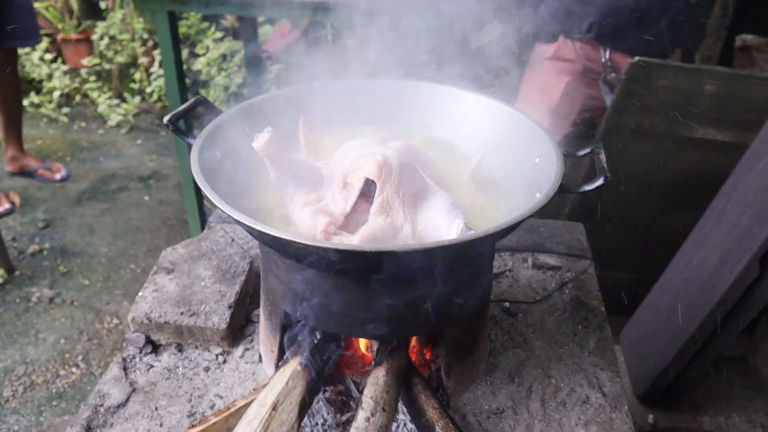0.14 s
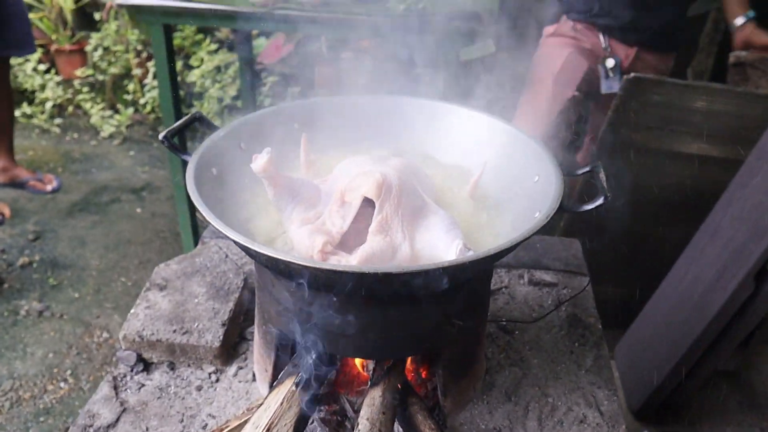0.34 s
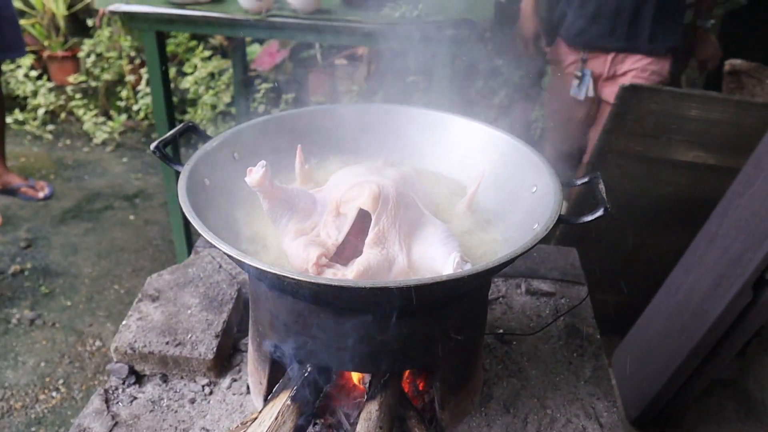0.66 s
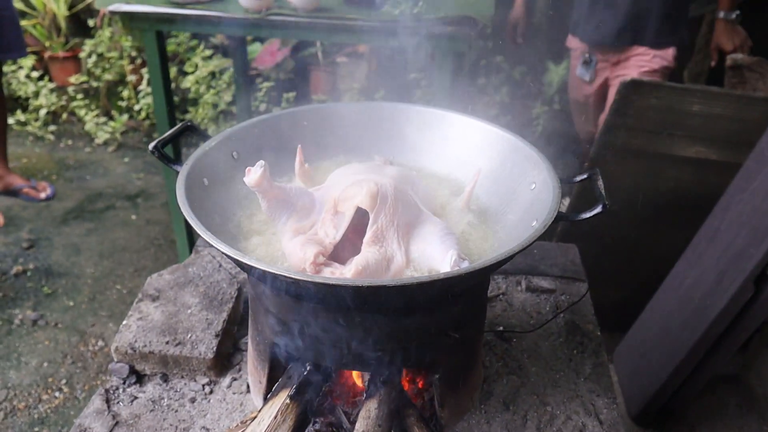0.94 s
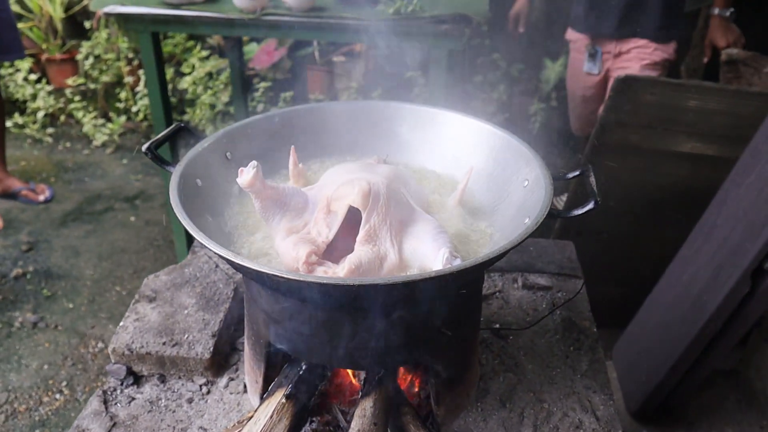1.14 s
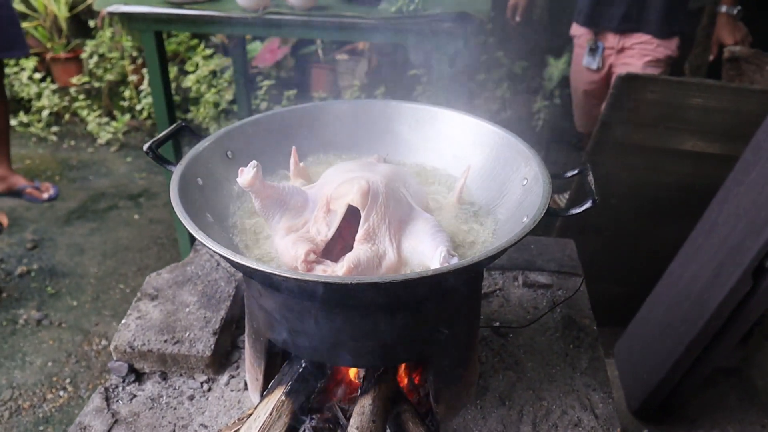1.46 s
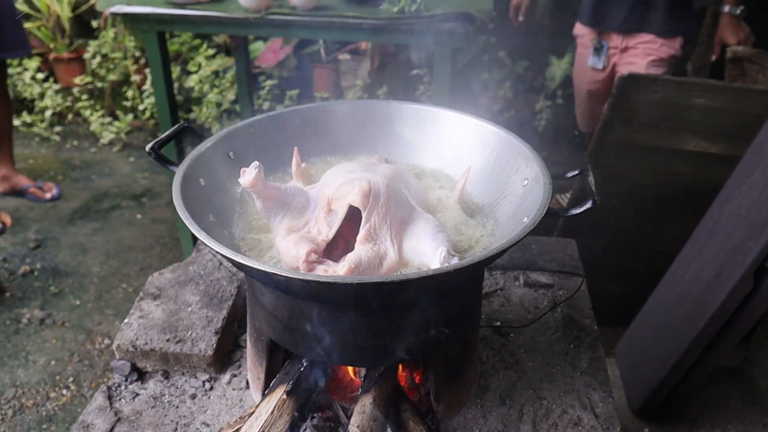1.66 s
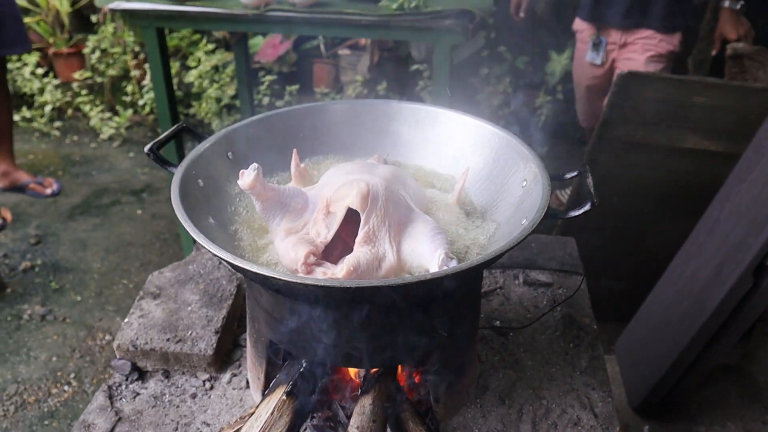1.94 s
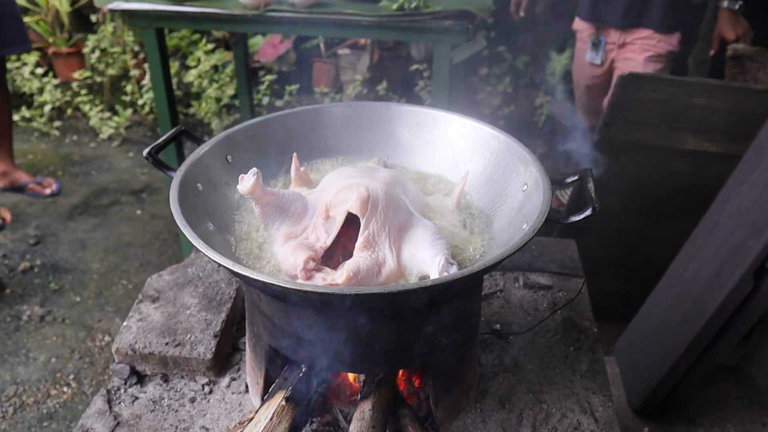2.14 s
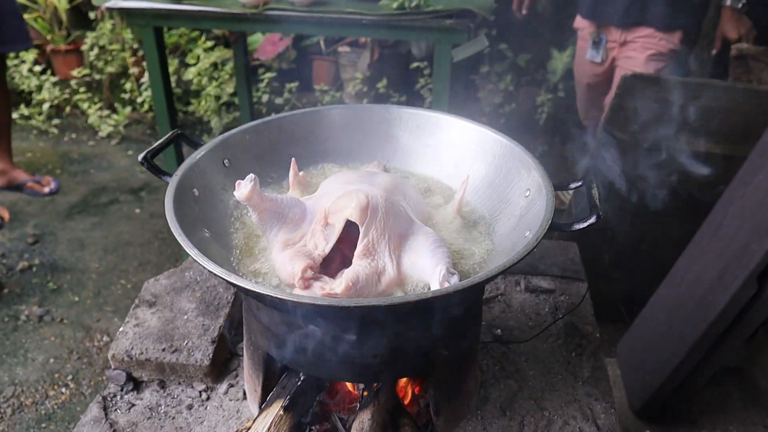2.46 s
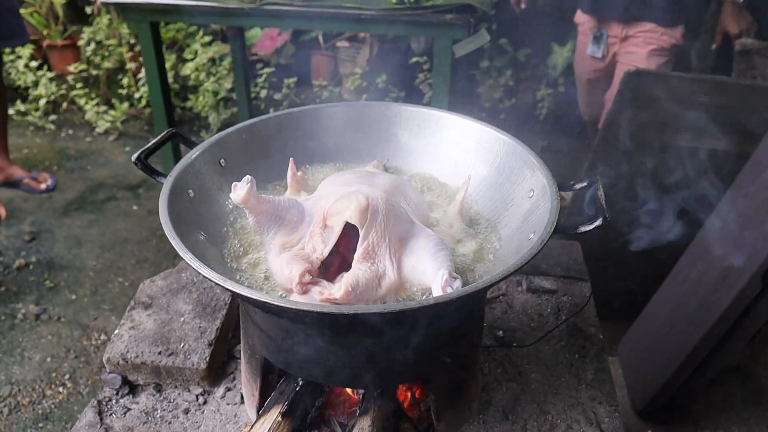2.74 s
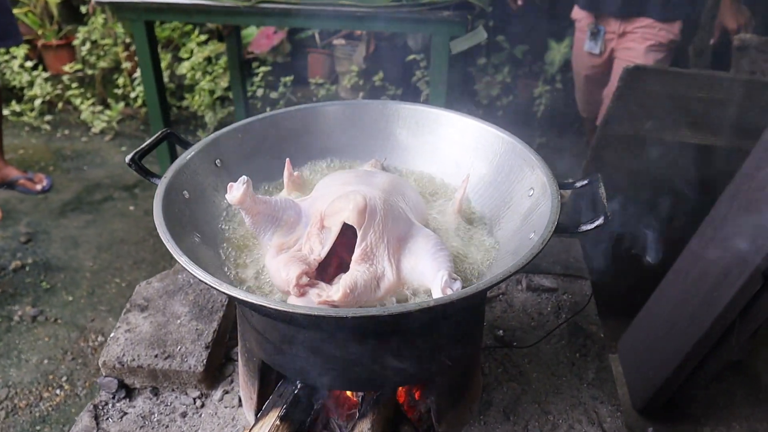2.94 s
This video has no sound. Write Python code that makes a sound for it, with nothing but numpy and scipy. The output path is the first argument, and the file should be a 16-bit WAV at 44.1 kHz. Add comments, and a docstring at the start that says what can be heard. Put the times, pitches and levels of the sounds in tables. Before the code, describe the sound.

A whole chicken frying in hot oil, fierce sizzle easing into crackling, popping bubbles and spits

```python
"""Chicken frying in a wok

A whole chicken fries in a wok of hot oil over a wood fire, outdoors.
The fierce sizzle, a mass of filtered random clicks, settles under a fine crackle of spray and short fizzes.
Steam bubbles stand out as round pops and drops of water as sharp spits, each a ringing, quickly damped sine.
Soft gliding gurgles, the fire's filtered-noise rumble and a wavering hum lie faintly below.
"""
import sys
import numpy as np
from scipy import signal
from scipy.fft import rfft, irfft, next_fast_len
from scipy.io import wavfile

SR = 44100
rng = np.random.default_rng(int(sys.argv[2]) if len(sys.argv) > 2 else 0)


def bounce(signal):
    """Save signal as a 16-bit WAV file at the path given by the first command-line argument."""
    frames = np.transpose(np.atleast_2d(signal))
    limited = np.clip(frames, -1, 1)
    pcm = np.round(limited * 32767).astype(np.int16)
    wavfile.write(sys.argv[1], SR, pcm)


N = 136710  # length in samples

# Vigour of the frying, joined by straight lines: start_s [s], vigour_db [dB]
VIGOUR = [(0, -16.5), (.2, -16.5), (.43, -18), (.55, -19.5), (.9, -21.5), (1.25, -22), (1.5, -24.5),
          (1.7, -22.5), (2.0, -25.5), (2.45, -25), (2.8, -25.5), (3.1, -27)]
# Spectrum of the fire's rumble, shape only: frequency_hz [Hz], level_db [dB per Hz]
FIRE_SPECTRUM = [(20, -11), (60, -10), (120, 1), (200, 4), (330, 10), (700, -42.5), (2000, -50)]
# Low gurgles: start_s [s], length_s [s], start_pitch_hz [Hz], end_pitch_hz [Hz], peak_db [dB]
GURGLES = [(.655, 0.057, 242, 174, -44), (0.684, 0.024, 370, 352, -39.5), (0.867, 0.057, 293, 386, -43),
           (1.618, 0.017, 249, 240, -45), (3.077, 0.025, 520, 543, -30.5)]
# Spectrum of the sizzling foam, shape only: frequency_hz [Hz], level_db [dB per Hz]
SIZZLE_SPECTRUM = [(100, -54), (250, -27.5), (400, -23), (510, -14.5), (700, -10.5), (850, -16.5),
                   (1150, -6), (2000, -3.5), (3200, -0.5), (4500, -2.5), (6000, -5), (7200, -16),
                   (8500, -22.5), (11000, -27.5), (14000, -28), (16000, -51)]
# Spectrum of the crackling spray, shape only: frequency_hz [Hz], level_db [dB per Hz]
CRACKLE_SPECTRUM = [(300, -24.5), (1500, -18), (5500, -6.5), (7200, -2.5), (8500, -7.5), (10500, -4),
                    (12700, -4.5), (14500, -13), (16000, -22)]
# Edges between the bands of the foam's tiny bubbles: edge_hz [Hz]
FOAM_EDGES_HZ = [90, 1000, 2200, 4200, 7800, 18000]
# Edges between the bands of the spray: edge_hz [Hz]
SPRAY_EDGES_HZ = [3000, 8500, 12000, 17000]
# Steam fizzing out from under the skin: start_s [s], length_s [s], level_db [dB]
PUFFS = [(1.363, .02, -31), (1.619, 0.014, -20), (1.649, 0.017, -25), (2.166, 0.019, -25),
         (2.323, .014, -15.5), (2.356, 0.015, -16), (2.599, 0.011, -13), (2.647, 0.015, -17),
         (2.719, 0.0084, -15.5), (2.876, 0.016, -22), (3.055, 0.022, -20)]
# Small bubbles by size, at calm vigour and before trim: pitch_hz [Hz], level_db [dB]
BUBBLE_SIZES = [(520, -22), (700, -17.5), (850, -10.5), (1150, -7.5), (1800, 3.5), (3000, 2), (4500, -2),
                (6200, -6)]
# Large steam bubbles bursting, before trim and wok colour: start_s [s], level_db [dB], pitch_hz [Hz]
POPS = [(0.5562, -11.5, 1060), (.679, -9.5, 1210), (0.6952, -9.5, 1580), (0.801, -6.5, 1490),
        (0.9212, -3.5, 1340), (1.0257, -10.5, 1190), (1.114, -22, 600), (1.316, -15, 1335),
        (1.3336, -9.5, 1740), (1.37, -6, 1390), (1.4121, -12, 2250), (1.4628, -11.5, 2080),
        (1.491, -12.5, 2220), (1.5837, -7.5, 1660), (1.6171, -10, 1960), (1.626, -20.5, 560),
        (1.6472, -13, 2000), (1.6505, -9, 1430), (1.7861, -8, 1580), (1.8923, -7, 1780), (1.9319, -9, 2040),
        (1.9457, -7, 1630), (1.98, -7, 1070), (2.082, -7.5, 2060), (2.0879, -9.5, 1740), (2.0985, -9, 1500),
        (2.1267, -14, 2670), (2.2741, -9.5, 1210), (2.2833, -12, 1060), (2.3344, -8, 2260),
        (2.3571, -10.5, 1120), (2.3734, -6, 1830), (2.4, -10.5, 1510), (2.4882, -11.5, 1940),
        (2.5369, -10, 2210), (2.5619, -15, 2200), (2.5777, -14.5, 1360), (2.6023, -17, 1360),
        (2.742, -2.5, 1320), (2.7782, -7.5, 1560), (2.7913, -10.5, 1580), (2.8505, -7, 1550),
        (2.883, -9, 2430), (2.9715, -11, 2290), (3.0067, -4, 2060)]
# Water drops spitting out of the oil, before trim and wok colour: start_s [s], level_db [dB], pitch_hz [Hz]
SPITS = [(.0664, -14, 12000), (0.4013, 0, 11100), (0.4073, -6, 5530), (0.4411, -2, 11000),
         (.6656, -10, 10300), (0.7403, -9, 5450), (0.755, -18, 4090), (.9149, -7.5, 9200),
         (0.9524, -6, 4990), (.9706, -11, 4000), (1.031, -18, 5340), (1.1678, 1.5, 11600),
         (1.1957, -8, 11300), (1.2822, -7, 11100), (1.4395, -15, 4780), (1.626, -11, 7200),
         (1.651, -8, 5000), (1.7311, -14, 12000), (1.9076, -18, 12000), (2.0754, -6.5, 5600),
         (2.1711, -11, 9500), (2.1773, -13, 2770), (2.3336, -15, 11100), (2.5928, -7, 11300),
         (2.627, -11.5, 11500), (2.7215, -18, 7000), (2.829, -8.5, 5150), (2.8516, -8, 4600),
         (2.8924, -2.5, 4630)]
# How the wok passes the bursts on; small cavities radiate little bass: frequency_hz [Hz], gain_db [dB]
WOK_COLOUR = [(150, -19), (400, -9), (520, -3), (700, -1.5), (860, -6), (1050, 1), (1300, 0.5), (1650, 0),
              (2200, 1.5), (16000, 1.5)]

CALM_DB = -24  # rates and levels below hold at this vigour
CROWDING = .8  # dB of burst rate (20 log10) per dB of vigour

# Fire and hum: levels in dB, speeds of the random drifts in Hz
FIRE_DB, FIRE_FLICKER_DB, FIRE_FLICKER_HZ = -58, 1.5, 8
HUM_DB, HUM_HZ, HUM_WAVER_HZ, HUM_WAVER_RATE_HZ = -68, 142, 2, 5

# Foam and spray: bursts per second, spread and level in dB, dB of level per dB of vigour
SIZZLE_PER_S, SIZZLE_SPREAD_DB, SIZZLE_TRIM_DB, SIZZLE_FOLLOWS = 1900, 3.5, -1.5, 0.99
CRACKLE_PER_S, CRACKLE_SPREAD_DB, CRACKLE_DB, CRACKLE_FOLLOWS = 800, 5, -35.5, 1.6
SURGE_DB, SURGE_RATE_HZ = 1.3, 37.7  # how far and how fast the foam surges
PUFF_BAND_HZ, PUFF_SPREAD_DB = (1570, 4300), 6

# Small bubbles: BUBBLE_SWELL is the dB by which pitch falls (20 log10) per dB of vigour
BUBBLES_PER_S, BUBBLE_TRIM_DB, BUBBLE_SPREAD_DB, BUBBLE_LARGEST_DB = 850, -21.5, 5, 12
BUBBLE_CYCLES, BUBBLE_FOLLOWS, BUBBLE_SWELL = 0.83, 0.18, 0.19

# Single bursts: cycles to the peak, share by which pitch has risen at the peak, trims in dB
POP_CYCLES, POP_RISE, POP_TRIM_DB = 0.77, 0.011, .5
SPIT_CYCLES, SPIT_TRIM_DB = 0.39, 4
SKIN_TRIM_DB, SKIN_HZ = -5, 3540  # tick of a large bubble's skin tearing, around this pitch

SCATTER_DB, SCATTER_T60_S = -13, 0.028  # reflections inside the wok
CUTOFF_HZ = 16000


def from_db(db):
    """Turn decibels into gain."""
    return 10 ** (np.asarray(db) / 20)


def rms_one(x):
    """Scale a sound to rms 1."""
    return x / np.sqrt(np.mean(x ** 2) + 1e-20)


def at_hz(points, hz):
    """Read a spectrum in dB along a log-frequency axis."""
    f, db = np.transpose(points)
    return np.interp(np.log(np.maximum(hz, 1)), np.log(f), db)


def drift(rate_hz):
    """Wander at random with rms 1: noise smoothed by two equal poles, after a second to settle."""
    pole = np.exp(-2 * np.pi * rate_hz / SR)
    noise = rng.standard_normal(N + SR)
    return rms_one(signal.lfilter([1], [1, -2 * pole, pole * pole], noise)[SR:])


def colour(x, spectrum):
    """Give a sound a spectrum with a causal, minimum-phase filter built by folding the cepstrum."""
    size = 2 * next_fast_len(N)
    gain = from_db(at_hz(spectrum, np.arange(size // 2 + 1) * SR / size))
    cepstrum = irfft(np.log(gain))
    cepstrum[1:size // 2] *= 2
    cepstrum[size // 2 + 1:] = 0
    response = np.exp(rfft(cepstrum))
    return irfft(rfft(x, size) * response)[:N]


def band_pass(x, band_hz):
    """Keep one band of a sound."""
    return signal.sosfilt(signal.butter(2, band_hz, "band", fs=SR, output="sos"), x)


def add(out, start_s, sound):
    """Mix a sound in at a time."""
    i = int(np.clip(start_s * SR, 0, N))
    out[i:i + len(sound)] += sound[:N - i]


def sizes(chance, spread_db):
    """Turn uniform chance into many small bursts and few large ones, with a ceiling."""
    return from_db(-spread_db * np.log(.012 + .988 * chance))


def clicks(per_s, spread_db):
    """Scatter clicks of either sign; where they crowd they shrink, so mean power stays even."""
    born = rng.random(N) < per_s / SR
    heights = sizes(rng.random(N), spread_db)
    signs = rng.choice([-1, 1], N)
    return rms_one(born * heights * signs / np.sqrt(per_s))


def grains(per_s, spread_db, edges_hz):
    """Let each size of tiny bubble burst in its own band and at its own moments."""
    bands = zip(edges_hz, edges_hz[1:])
    return sum(band_pass(clicks(per_s, spread_db), band) for band in bands)


def burst(pitch_hz, cycles, rise):
    """Burst a bubble: its cavity rings up within a cycle or so and dies at once; rise lifts the pitch."""
    t = np.arange(int(10 * cycles / pitch_hz * SR) + 2) / SR
    age = t * pitch_hz / cycles  # 1 at the peak
    envelope = age * np.exp(1 - age)
    return envelope * np.sin(2 * np.pi * pitch_hz * t * (1 + rise * age / 2))


def fire():
    """The fire's rumble: low coloured noise whose level flickers at random."""
    rumble = rms_one(colour(rng.standard_normal(N), FIRE_SPECTRUM))
    return rumble * from_db(FIRE_DB + FIRE_FLICKER_DB * drift(FIRE_FLICKER_HZ))


def hum():
    """A faint low sine whose pitch wavers at random."""
    pitch_hz = HUM_HZ + HUM_WAVER_HZ * drift(HUM_WAVER_RATE_HZ)
    return from_db(HUM_DB) * np.sin(2 * np.pi * np.cumsum(pitch_hz) / SR)


def gurgles():
    """Soft, low sines glide in pitch under the sizzle, each swelling and fading."""
    out = np.zeros(N)
    for start_s, length_s, start_hz, end_hz, peak_db in GURGLES:
        pitch_hz = np.linspace(start_hz, end_hz, int(length_s * SR))
        tone = np.sin(2 * np.pi * np.cumsum(pitch_hz) / SR)
        add(out, start_s, from_db(peak_db) * np.hanning(len(tone)) * tone)
    return out


def foam(vigour_db):
    """Countless tiny bursts make the surging sizzle, denser and louder with vigour."""
    surge_db = SURGE_DB * drift(SURGE_RATE_HZ)
    per_s = SIZZLE_PER_S * from_db(CROWDING * vigour_db)
    sizzle = rms_one(colour(grains(per_s, SIZZLE_SPREAD_DB, FOAM_EDGES_HZ), SIZZLE_SPECTRUM))
    return sizzle * from_db(CALM_DB + SIZZLE_TRIM_DB + SIZZLE_FOLLOWS * vigour_db + surge_db)


def spray(vigour_db):
    """Sparser bursts crackle on top; their rate and level climb more steeply with vigour."""
    per_s = CRACKLE_PER_S * from_db(CROWDING * vigour_db) ** 2
    crackle = rms_one(colour(grains(per_s, CRACKLE_SPREAD_DB, SPRAY_EDGES_HZ), CRACKLE_SPECTRUM))
    return crackle * from_db(CRACKLE_DB + CRACKLE_FOLLOWS * vigour_db)


def puffs():
    """Steam fizzes out from under the skin: short, dense runs of tiny bursts in one band."""
    swell = np.zeros(N)
    for start_s, length_s, level_db in PUFFS:
        add(swell, start_s, from_db(level_db) * np.hanning(int(length_s * SR)))
    return swell * rms_one(band_pass(clicks(SIZZLE_PER_S, PUFF_SPREAD_DB), PUFF_BAND_HZ))


def small_bubbles(vigour_db):
    """Bubbles burst at random; fierce frying makes them more frequent, louder, larger and lower."""
    out = np.zeros(N)
    birth, pitch_chance, size_chance, length_chance = rng.random((4, N))
    per_s = BUBBLES_PER_S * from_db(CROWDING * vigour_db)
    lowest_hz, highest_hz = BUBBLE_SIZES[0][0], BUBBLE_SIZES[-1][0]
    for i in np.flatnonzero(birth < per_s / SR):
        calm_hz = lowest_hz * (highest_hz / lowest_hz) ** pitch_chance[i]
        size = min(sizes(size_chance[i], BUBBLE_SPREAD_DB), from_db(BUBBLE_LARGEST_DB))
        level_db = BUBBLE_TRIM_DB + at_hz(BUBBLE_SIZES, calm_hz) + BUBBLE_FOLLOWS * vigour_db[i]
        pitch_hz = calm_hz * from_db(-BUBBLE_SWELL * vigour_db[i])
        ring = burst(pitch_hz, BUBBLE_CYCLES * (.5 + length_chance[i]), POP_RISE)
        add(out, i / SR, size * from_db(level_db) * ring / 2)
    return out


def spits():
    """Water drops spit out of the oil: sharp bursts that peak in fewer cycles than a pop."""
    out = np.zeros(N)
    for start_s, level_db, pitch_hz in SPITS:
        add(out, start_s, from_db(level_db + SPIT_TRIM_DB) * burst(pitch_hz, SPIT_CYCLES, 0))
    return out


def pops():
    """Large steam bubbles burst: the skin tears with a tick and the cavity rings as a round pop."""
    out = np.zeros(N)
    for start_s, level_db, pitch_hz in POPS:
        add(out, start_s, from_db(level_db + POP_TRIM_DB) * burst(pitch_hz, POP_CYCLES, POP_RISE))
        tick = burst(SKIN_HZ * rng.uniform(0.49, 1.7), SPIT_CYCLES, 0)
        add(out, start_s, from_db(level_db + SKIN_TRIM_DB) * tick)
    return out


def wok(bursts):
    """The bowl colours the bursts and adds a brief, decaying scatter of reflections."""
    t = np.arange(int(.04 * SR)) / SR
    tail = rng.standard_normal(len(t)) * from_db(-60 * t / SCATTER_T60_S)
    scatter = signal.fftconvolve(bursts, tail / np.linalg.norm(tail))[:N]
    return colour(bursts + from_db(SCATTER_DB) * scatter, WOK_COLOUR)


def scene():
    """The wok heard from close by; one vigour drives foam, spray and small bubbles."""
    # dB above the calm vigour
    vigour_db = np.interp(np.arange(N) / SR, *np.transpose(VIGOUR)) - CALM_DB
    bursts = small_bubbles(vigour_db) + pops() + spits()
    frying = foam(vigour_db) + spray(vigour_db) + wok(bursts) + puffs()
    background = gurgles() + fire() + hum()
    return (frying + background)[None]


def record(dry):
    """Round the highest peaks with a smooth limiter and cut the top with a steep low-pass."""
    rounded = dry / (1 + dry ** 6) ** (1 / 6)
    return signal.sosfilt(signal.ellip(10, .1, 80, CUTOFF_HZ, fs=SR, output="sos"), rounded)


dry = scene()
out = record(dry)
bounce(out)
```